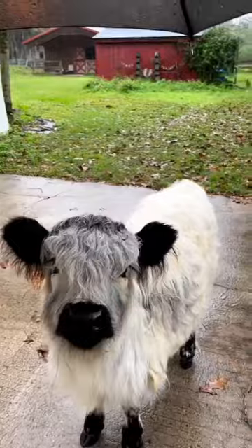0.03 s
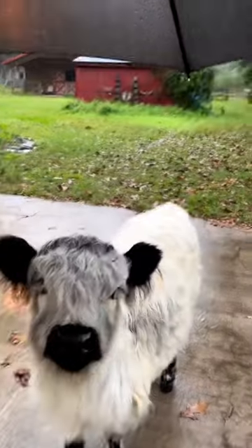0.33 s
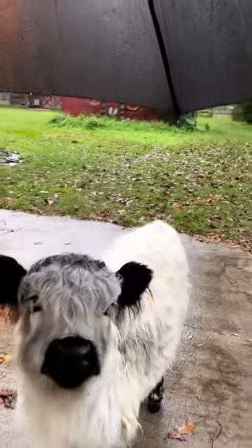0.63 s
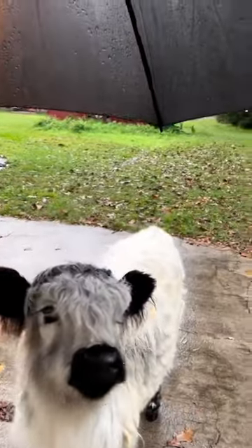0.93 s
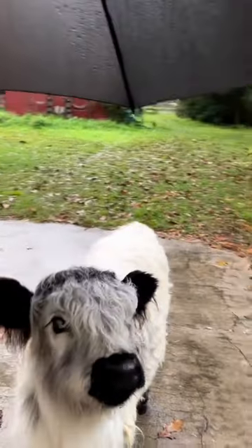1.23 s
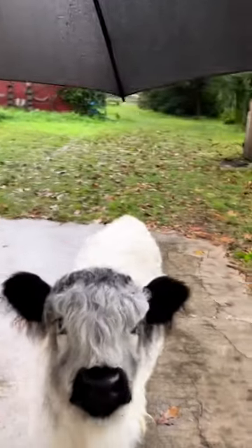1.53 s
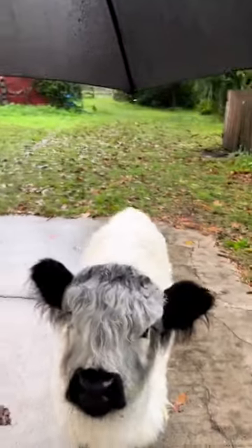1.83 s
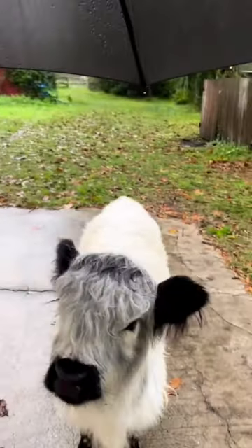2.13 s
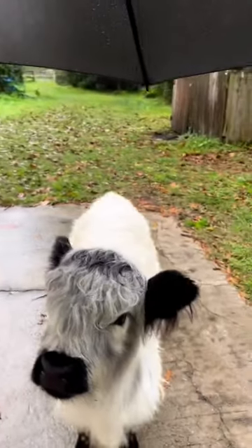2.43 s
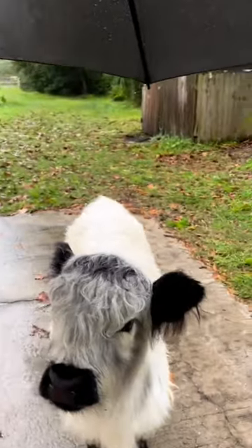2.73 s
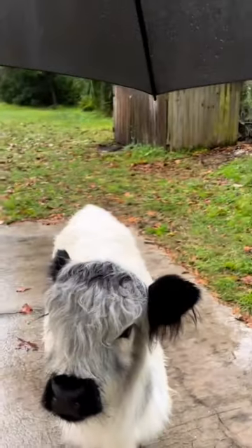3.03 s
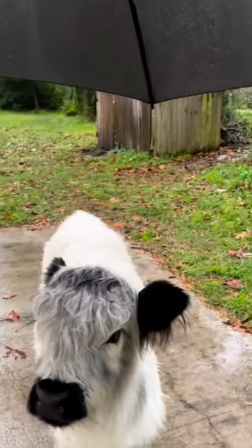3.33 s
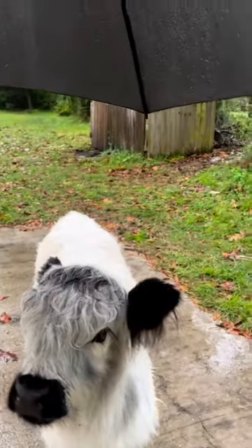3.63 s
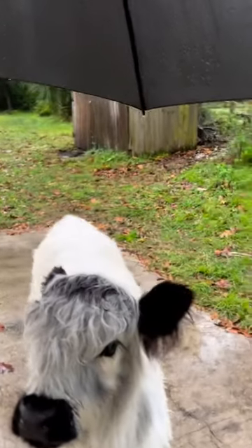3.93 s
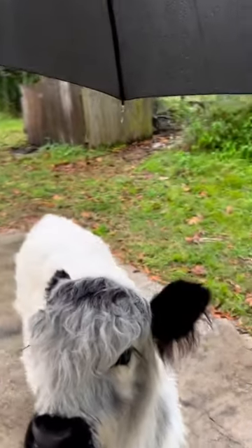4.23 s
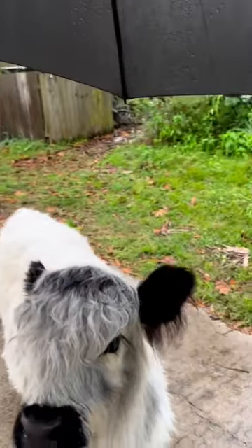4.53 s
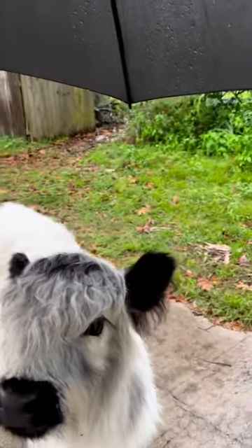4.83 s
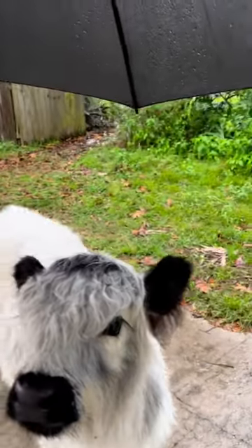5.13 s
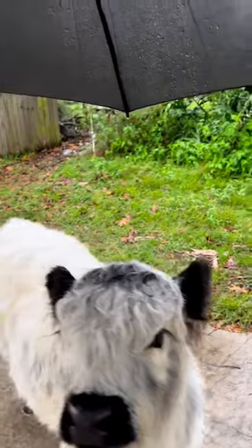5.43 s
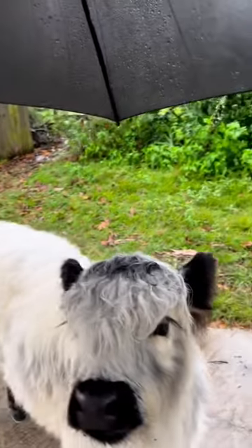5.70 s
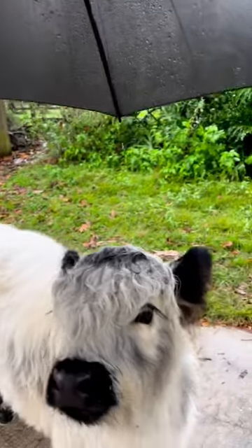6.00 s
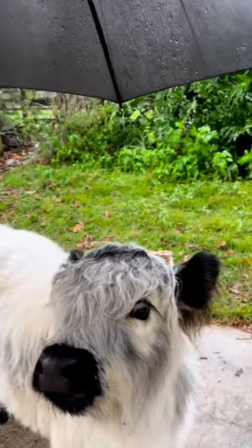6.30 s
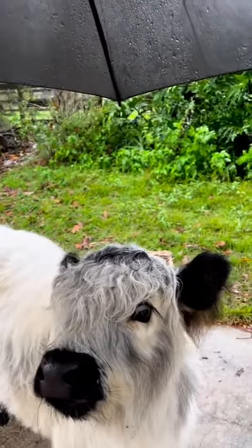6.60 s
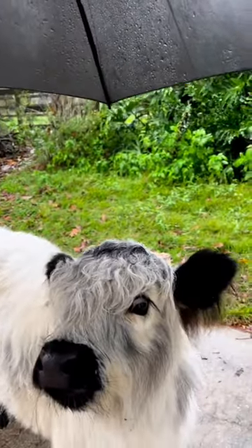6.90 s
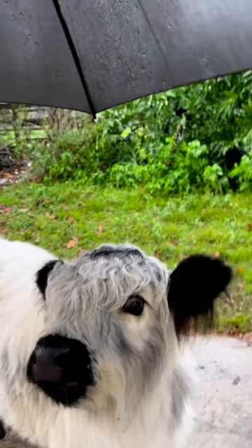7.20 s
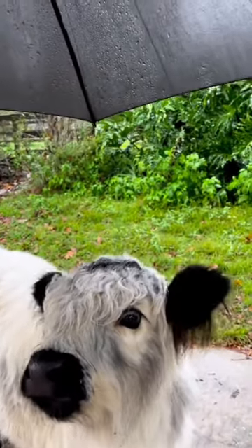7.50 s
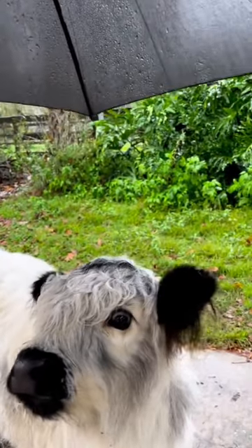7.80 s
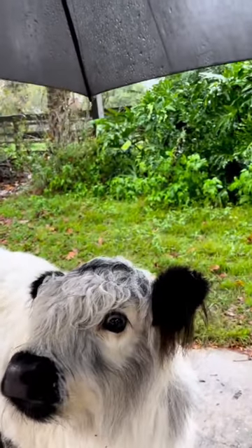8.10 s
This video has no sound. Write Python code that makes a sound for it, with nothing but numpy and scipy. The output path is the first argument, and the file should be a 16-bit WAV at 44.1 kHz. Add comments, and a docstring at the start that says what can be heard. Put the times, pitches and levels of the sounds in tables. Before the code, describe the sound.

Low gusts of wind buffet the microphone under an umbrella as light rain hisses and patters over a yard. Single drops splash close by throughout. Thin bird calls come through the rain, joined in the second half by far whistles, a brief twitter and a couple of buzzy chips. The wind eases to a steady low hum, and some drops tap crisply on the canopy.

```python
"""Light farmyard rain under an umbrella

Far drops merge into hiss; near ones patter on concrete and leaves and tick on the canopy.
Wind eddies rumble on the microphone, then sink after five seconds and bare a steady low drone.
Small birds whistle, chip and buzz in the trees, with a short diffuse echo."""
import sys
import numpy as np
from scipy import signal
from scipy.fft import rfft, irfft, next_fast_len
from scipy.io import wavfile
from scipy.ndimage import uniform_filter1d, minimum_filter1d, map_coordinates

SR = 44100
rng = np.random.default_rng(int(sys.argv[2]) if len(sys.argv) > 2 else 0)


def bounce(signal):
    """Save signal as a 16-bit WAV file at the path given by the first command-line argument."""
    frames = np.transpose(np.atleast_2d(signal))
    limited = np.clip(frames, -1, 1)
    pcm = np.round(limited * 32767).astype(np.int16)
    wavfile.write(sys.argv[1], SR, pcm)


N = 368235
TOP_HZ = 13150


def rain(patter_db=3, spray_db=-4.5, crossover_hz=5500):
    """Far rain is a smooth hiss; drops tick on leaves, splat on concrete and throw up fine spray."""
    strength = [(0.2, -36.5), (0.8, -36), (1.35, -37), (1.6, -37.5), (2.6, -37.5), (4.0, -38), (5.5, -37.5),
                (6.7, -37.5), (6.9, -39), (8.3, -38.5)]  # rain strength: (time [s], level [dB])
    hiss = amp(5.8) * rng.standard_normal((2, N))
    ticks = amp(-4) * splashes(count=9000, spread_db=4, decay_s=.0006, crack=.55)
    splats = amp(1) * splashes(count=2500, spread_db=0, decay_s=.0035, crack=2.8)
    fall = in_yard(patchy(hiss + ticks + splats, depth_db=2.05))
    spray = filtered(fall, lambda hz: 1 - 1 / (1 + (hz / crossover_hz) ** 3))
    patter = fall - spray
    flurries = amp(curve(strength) + .6 * wobble(knots_per_s=36))
    spray_gain = amp(spray_db + 1.25 * wobble(knots_per_s=20))
    return flurries * (amp(patter_db) * unit(patter) + spray_gain * unit(spray))


def splashes(count, spread_db, decay_s, crack, samples=300):
    """Drops at random times: each a tiny ring and crack with its own pitch, decay and direction."""
    when, size, slowness, angle, pitch = rng.random((count, 5)).T[..., None]
    t = np.arange(samples) / SR
    strength = amp(spread_db * np.minimum(-np.log(1 - size), 4))
    ring_hz = 500 + (TOP_HZ - 500) * pitch
    tau_s = decay_s * 2 ** (2 * slowness - 1)
    bursts = np.sin(2 * np.pi * ring_hz * t) + crack * rng.standard_normal((count, samples))
    bursts *= strength * np.exp(-t / tau_s)
    index = ((when * N).astype(int) + np.arange(samples)).ravel()
    pans = np.cos(2 * np.pi * angle), np.sin(2 * np.pi * angle)
    pair = [np.bincount(index, (bursts * pan).ravel(), N + samples)[:N] for pan in pans]
    return unit(np.array(pair))


def patchy(pair, depth_db):
    """Each band swells and fades by itself, as drops cluster on different surfaces."""
    spectra = signal.stft(pair, nperseg=512)[2]
    field = uniform_filter1d(rng.standard_normal(spectra.shape[1:]), size=3, axis=0)
    field = uniform_filter1d(field, size=4, axis=1)
    return signal.istft(spectra * amp(depth_db * unit(field)), nperseg=512)[1][:, :N]


def in_yard(pair):
    """Two unrelated white signals take the colour and stereo image of the wet yard."""
    spectrum = [(60, -74), (200, 7.5), (320, 3.5), (520, 1.5), (1000, -2.5), (1800, -5), (2600, -5.5),
                (3600, -9), (5000, -12), (6200, -14), (7400, -18.5), (8500, -20.5), (11000, -21),
                (13000, -26)]  # rain colour: (frequency [Hz], density [dB])
    correlation = [(250, 1), (600, 0.69), (1050, 0.15), (1500, 0.5), (1800, 0.86), (2350, -0.33),
                   (3200, -0.53), (4000, -0.094), (5000, 0.42), (6000, -0.95), (7000, 0.015), (7700, 0.93),
                   (8700, 0.48), (9500, -0.17), (11200, 0.17), (12200, -0.3), (13000, -0.19)]  # stereo width: (frequency [Hz], left-right correlation [-1..1])
    balance = [(250, -0.5), (700, 3), (1800, 0.5), (2700, 0), (4800, -0.8), (7000, 0)]  # stereo lean: (frequency [Hz], left minus right [dB])

    def mid_side_gains(hz):
        width_rad = np.arccos(np.clip(along(correlation, hz), -1, 1)) / 2
        return amp(along(spectrum, hz)) * [np.cos(width_rad), np.sin(width_rad)]

    mid, side = filtered(pair, mid_side_gains)
    ears = np.array([mid + side, mid - side])
    return unit(filtered(ears, lambda hz: amp(np.outer([.5, -.5], along(balance, hz)))))


def spatters(highpass_hz=3700):
    """Clusters of fine, crisp drops swell and fade."""
    clusters = [(0.308, 0.11, -40), (0.818, 0.09, -42), (1.25, .16, -42), (2.302, 0.062, -54),
                (3.54, 0.063, -41), (3.74, 0.1, -37), (3.85, 0.086, -39), (4.21, 0.086, -38),
                (5.382, 0.07, -39.5), (5.497, 0.065, -43)]  # drop clusters: (time [s], length [s], level [dB])
    fine = in_yard(splashes(count=12000, spread_db=.5, decay_s=.00056, crack=1))
    fine = unit(filtered(fine, lambda hz: 1 - 1 / (1 + (hz / highpass_hz) ** 4)))
    t = np.arange(N) / SR
    return fine * sum(amp(db) * np.sin(np.pi * np.clip((t - start_s) / length_s, 0, 1))
                      for start_s, length_s, db in clusters)


def close_drops(ring_t60_s=.014, crack_t60_s=.0081, tail_t60_s=.05):
    """A close drop rings what it strikes for a few cycles and bursts into a short splash."""
    drops = [(0.365, -32, 754, -28), (0.588, -22.5, 1660, -34), (0.696, -37, 802, -23),
             (0.965, -40, 900, -27), (1.027, -38, 900, -28), (1.125, -26, 1030, -26),
             (1.265, -38, 900, -24), (1.332, -25.5, 1440, -33), (1.344, -30, 1000, -34),
             (1.964, -25, 837, -36), (2.657, -39, 851, -33), (2.793, -41, 900, -21), (3.208, -28, 834, -27),
             (4.248, -41, 900, -28), (5.31, -20.5, 2050, -37), (5.418, -38, 900, -28),
             (5.52, -27, 2120, -29), (5.675, -27, 1020, -25), (5.983, -36, 2600, -35),
             (6.254, -28, 1730, -32), (6.394, -36, 861, -22), (6.508, -31, 1240, -34),
             (6.678, -28, 1400, -32), (7.412, -29, 1960, -30), (7.739, -22.5, 724, -26),
             (7.742, -23.5, 1780, -29), (7.752, -28, 1250, -30), (8.17, -33, 996, -37)]  # impacts: (time [s], ring [dB], ring [Hz], splash [dB])
    out, t = np.zeros((2, N)), np.arange(SR // 12) / SR
    splash_band = signal.butter(1, [1800, 10500], "band", fs=SR)
    for start_s, ring_db, ring_hz, splash_db in drops:
        ring = np.sin(2 * np.pi * ring_hz * t) * amp(-60 * t / ring_t60_s)
        burst = signal.lfilter(*splash_band, rng.standard_normal((2, len(t))))
        splash = burst * (amp(-60 * t / crack_t60_s) + amp(-19 - 60 * t / tail_t60_s))
        add(out, start_s, amp(ring_db) * ring + amp(splash_db) * splash)
    return out


def umbrella_ticks(t60_s=.005, crack=.6):
    """A drop on the taut canopy or a rib gives one dry, bright tick."""
    hits = [(6.0666, -20, 4800, -9), (6.0805, -28, 2600, 0), (7.1205, -30, 2400, 2),
            (7.1313, -29.5, 5300, -8)]  # canopy hits: (time [s], level [dB], ring [Hz], left minus right [dB])
    out, t = np.zeros((2, N)), np.arange(SR // 50) / SR
    for start_s, db, ring_hz, pan_db in hits:
        tick = np.sin(2 * np.pi * ring_hz * t) + crack * rng.standard_normal(len(t))
        ear_gains = amp(db + pan_db * np.array([[.5], [-.5]]))
        add(out, start_s, ear_gains * tick * amp(-60 * t / t60_s))
    return out


def wind():
    """Big eddies rumble on the microphone; small ones flutter above them. Both surge at random."""
    rumble_gusts = [(0.17, -7.5), (0.29, -2), (0.39, -15), (0.52, -9), (0.6, -9.5), (0.68, -3.5), (0.8, -5),
                    (0.89, -14), (1.49, -14.5), (1.58, -19), (1.91, -18), (2.0, -13), (2.08, -6.5),
                    (2.2, -3.5), (2.28, -10.5), (2.4, -13), (2.58, -13), (2.76, -14.5), (2.83, -20),
                    (3.3, -17.5), (3.58, -13.5), (3.82, -13), (3.95, -18), (4.33, -13.5), (4.47, -11),
                    (4.56, -21), (4.76, -10.5), (4.85, -21), (4.97, -14.5), (5.15, -23), (5.45, -23),
                    (5.85, -31), (6.7, -30.5), (7.1, -22), (7.43, -35), (7.55, -24.5), (8.3, -32)]  # big eddies: (time [s], level [dB])
    rumble_spectrum = [(15, -40), (25, -30), (35, -19), (46, -2), (52, 2.5), (61, 4.8), (73, -2),
                       (108, -3.8), (127, -13.5), (160, -26.5), (250, -35), (500, -90)]  # big eddies: (frequency [Hz], density [dB])
    flutter_gusts = [(0.15, -19.5), (0.45, -23.5), (0.65, -18), (0.85, -23.5), (1.1, -25.5), (1.3, -29),
                     (1.9, -31), (2.1, -21.5), (2.4, -20.5), (2.75, -29), (3.2, -32.5), (3.55, -35),
                     (3.9, -32.5), (4.05, -30), (4.5, -29), (5.35, -35), (5.6, -45.5), (8.3, -41)]  # small eddies: (time [s], level [dB])
    flutter_spectrum = [(90, -35), (130, 0), (156, 0.5), (190, -7), (215, -15), (260, -16.5), (400, -29),
                        (800, -59), (1600, -83)]  # small eddies: (frequency [Hz], density [dB])
    flutter_db = curve(flutter_gusts) + 1.93 * wobble(knots_per_s=12)
    rumble_db = curve(rumble_gusts) + 1.54 * wobble(knots_per_s=9)
    rumble = eddies(rumble_spectrum, rumble_db, side_db=-37.5)
    flutter = eddies(flutter_spectrum, flutter_db, side_db=-21.5)
    return rumble + flutter


def eddies(spectrum, gust_db, side_db, window_s=.11):
    """Turbulence whose level follows the gust, nearly the same in both ears."""
    mid, side = filtered(rng.standard_normal((2, N)), lambda hz: amp(along(spectrum, hz)))
    running_rms = np.sqrt(np.abs(uniform_filter1d(mid ** 2, int(window_s * SR))) + 1e-12)
    return amp(gust_db) * (mid + amp(side_db) * np.array([side, -side])) / running_rms


def birds():
    """Four voices: a far repeated whistle, one quick twitter, thin calls and buzzy chips."""
    # notes: (time [s], length [s], end pitch [Hz], level [dB], start above end pitch [ratio])
    thin_notes = [(.11, .085, 6980, -40.5, -.02), (.42, .035, 7800, -44, .005),
                  (.525, .04, 6700, -40.5, .08), (2.217, .025, 7830, -36, -.08),
                  (2.246, .028, 7450, -43.5, .04), (2.28, .02, 7750, -46, -.07),
                  (2.324, .012, 7550, -44, -.04), (3.62, .12, 6980, -49, 0), (3.875, .03, 7400, -43.5, .02),
                  (4.402, .02, 7530, -41, 0)]
    chip_notes = [(5.243, 0.064, 7700, -38.5, -0.16), (6.706, 0.039, 7470, -30.5, -0.091)]
    # notes: same columns, then (phase between ears [rad])
    whistle_notes = [(3.94, .155, 2520, -42.5, .015, 1.2), (5.3, .13, 2510, -45.5, .035, 1.6),
                     (5.68, .12, 2600, -47, .04, 2.0), (6.47, .13, 2500, -46.5, .05, 2.3),
                     (7.715, .16, 2485, -39, .08, 2.7), (8.17, .155, 2485, -38.5, .06, 2.1)]
    twitter_notes = [(4.935, .06, 5940, -35.5, .03, 2.2), (5.02, .056, 5960, -33.5, .04, 3.1),
                     (5.105, .062, 6010, -32.5, .03, 2.7), (5.207, .038, 6020, -34.5, .02, 2.6),
                     (5.29, .04, 6170, -35, .02, 2.4)]
    whistles = sum(sing([note], buzz_depth_hz=20, ear_phase_rad=phase, waver=.011, taper=.35)
                   for *note, phase in whistle_notes)
    twitter = sum(sing([note], buzz_depth_hz=30, ear_phase_rad=phase, taper=1.2)
                  for *note, phase in twitter_notes)
    thin_calls = sing(thin_notes, buzz_depth_hz=100, ear_phase_rad=1.65)
    chips = sing(chip_notes, buzz_depth_hz=345, ear_phase_rad=1)
    return whistles + twitter + thin_calls + chips


def sing(notes, buzz_depth_hz, ear_phase_rad, waver=.006, taper=.5, buzz_rate_hz=180, tremble_db=1.8):
    """Each note swells as it glides and settles; it wavers, and fast pitch flutter makes it buzz."""
    out = np.zeros((2, N))
    for start_s, length_s, end_hz, db, glide in notes:
        t = np.arange(int(length_s * SR)) / SR
        progress = t / length_s
        jitter = map_coordinates(rng.standard_normal(256), [t * 500], mode="mirror")
        flutter = np.sin(2 * np.pi * buzz_rate_hz * t) + .41 * jitter
        drift, tremble = (map_coordinates(knots, [t * 60], mode="mirror")
                          for knots in rng.standard_normal((2, 32)))
        glide_hz = end_hz * (1 + glide * (1 - progress) ** 2)
        pitch_hz = (glide_hz + buzz_depth_hz * flutter) * (1 + waver * drift)
        phase_rad = 2 * np.pi * np.cumsum(pitch_hz) / SR + ear_phase_rad * np.array([[.5], [-.5]])
        swell = np.abs(np.sin(np.pi * progress ** 1.2)) ** taper
        add(out, start_s, amp(db + tremble_db * tremble) * np.sqrt(2) * swell * np.sin(phase_rad))
    return out


def echo(x):
    """Trees and barn scatter a short diffuse tail."""
    decay = [(500, 0.31), (3000, 0.099), (9000, 0.49)]  # reverberation: (frequency [Hz], t60 [s])
    hz, t, spectra = signal.stft(rng.standard_normal((2, SR // 2)), SR, nperseg=256)
    tail = signal.istft(spectra * amp(-60 * t / along(decay, hz)[:, None]), SR, nperseg=256)[1]
    return signal.fftconvolve(x, tail / np.linalg.norm(tail[0]), axes=1)[:, :N]


def drone(level_db=-27.5):
    """Steady low noise, the same in both ears."""
    spectrum = [(30, -34), (48, -16), (61, -2), (70, -2), (82, -0.5), (100, -6), (130, -5), (180, -20.5),
                (230, -20.5), (400, -70)]  # drone colour: (frequency [Hz], density [dB])
    return amp(level_db) * unit(filtered(rng.standard_normal(N), lambda hz: amp(along(spectrum, hz))))


def amp(db):
    """Decibels to gain."""
    return 10 ** (np.asarray(db) / 20)


def unit(x):
    """x at rms 1."""
    return x / np.sqrt(np.mean(x ** 2) + 1e-20)


def along(points, hz):
    """(Hz, value) points read on a log axis."""
    knots_hz, values = np.transpose(points)
    return np.interp(np.log(hz + 1), np.log(knots_hz + 1), values)


def curve(rows):
    """(s, value) rows as one value per sample."""
    return np.interp(np.arange(N) / SR, *np.transpose(rows))


def wobble(knots_per_s):
    """Smooth random curve."""
    knots = rng.standard_normal(int(N * knots_per_s / SR) + 4)
    return map_coordinates(knots, [np.arange(N) * knots_per_s / SR])


def filtered(x, response):
    """Zero-phase filter with gain response(hz)."""
    size = next_fast_len(N + SR // 2)
    return irfft(rfft(x, size) * response(np.fft.rfftfreq(size, 1 / SR)), size)[..., :N]


def add(track, start_s, sound):
    """Mix a stereo sound into the track."""
    part = track[:, max(round(start_s * SR), 0):][:, :sound.shape[1]]
    part += sound[:, :part.shape[1]]


def limited(x, ceiling, hold_s):
    """The gain ducks smoothly around every peak above the ceiling."""
    gain = np.minimum(1, ceiling / (np.abs(x).max(axis=0) + 1e-9))
    width = max(int(hold_s * SR), 2)
    return x * uniform_filter1d(minimum_filter1d(gain, width), width)


def scene():
    """Rain all round, birds beyond it, wind at the microphone."""
    song = birds()
    far_song = song + amp(-10) * echo(song)
    return rain() + spatters() + close_drops() + umbrella_ticks() + far_song + wind() + drone()


def record(dry):
    """The recorder opens after a moment, limits the gusts and cuts everything above TOP_HZ."""
    start_s, fade_s = .105, .003
    fade_in = np.clip((np.arange(N) / SR - start_s) / fade_s, 0, 1)
    held = limited(dry * fade_in, ceiling=.92, hold_s=.03)
    return filtered(held, lambda hz: hz < TOP_HZ)


dry = scene()
out = record(dry)
bounce(out)
```